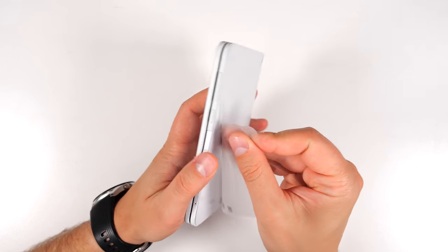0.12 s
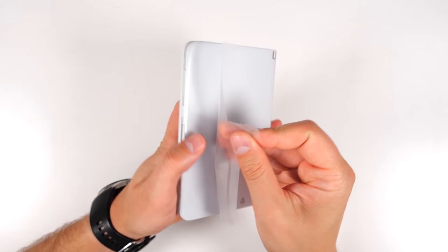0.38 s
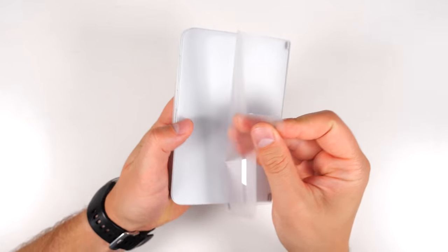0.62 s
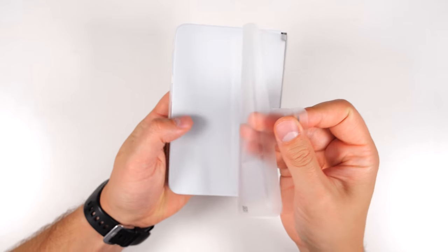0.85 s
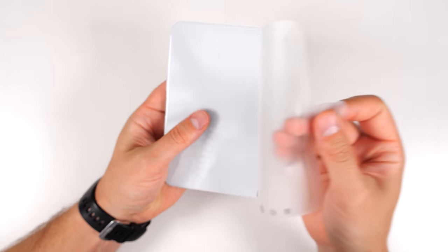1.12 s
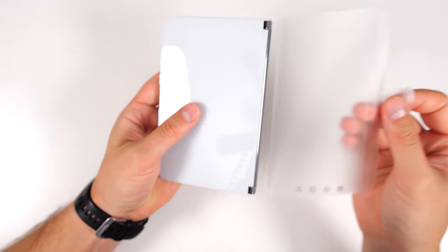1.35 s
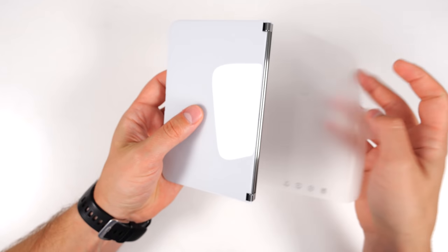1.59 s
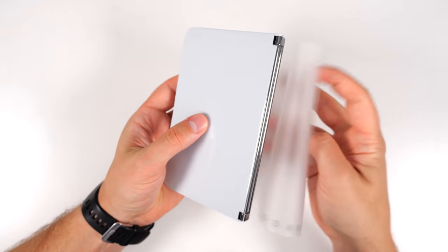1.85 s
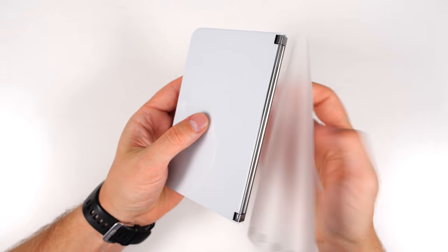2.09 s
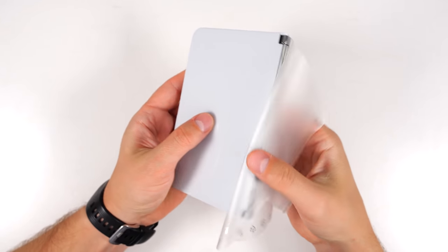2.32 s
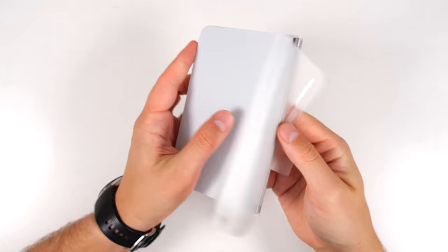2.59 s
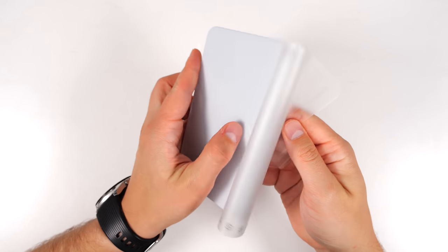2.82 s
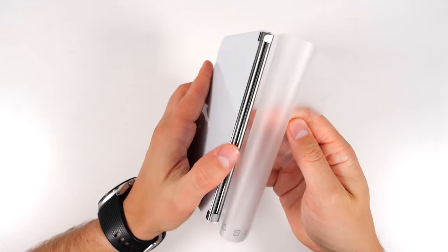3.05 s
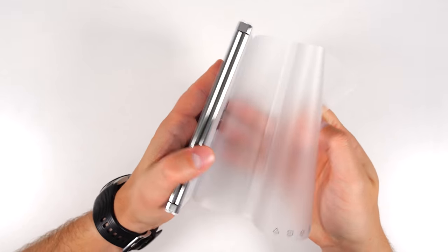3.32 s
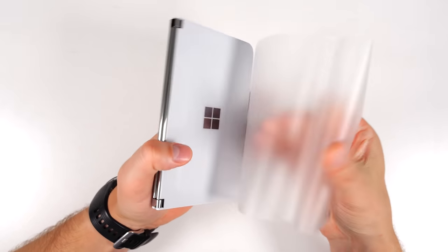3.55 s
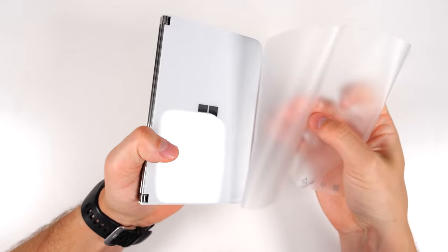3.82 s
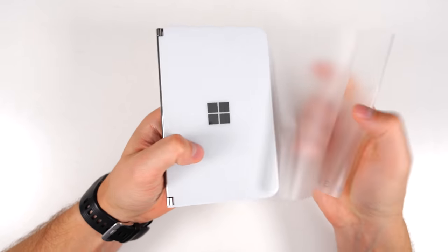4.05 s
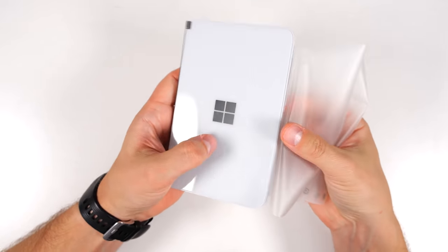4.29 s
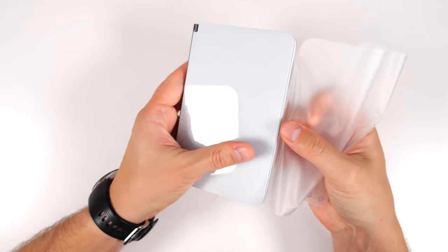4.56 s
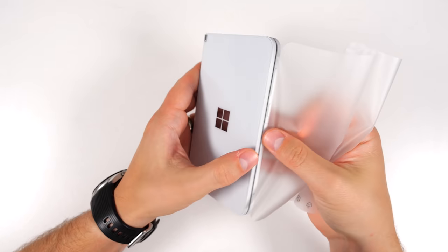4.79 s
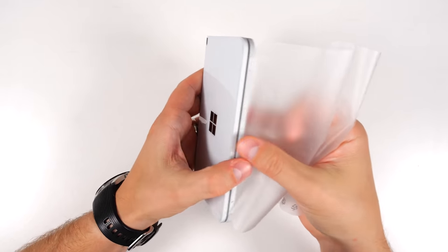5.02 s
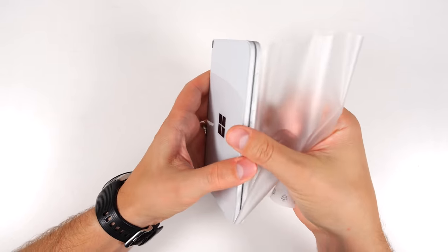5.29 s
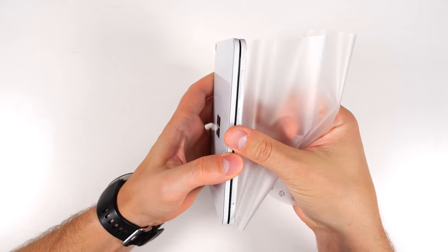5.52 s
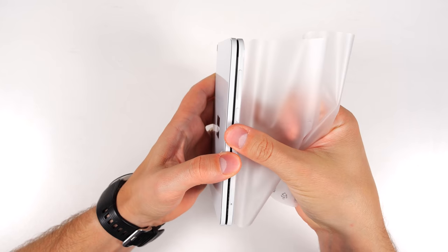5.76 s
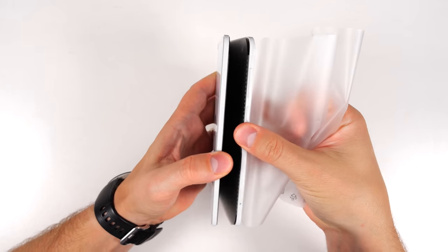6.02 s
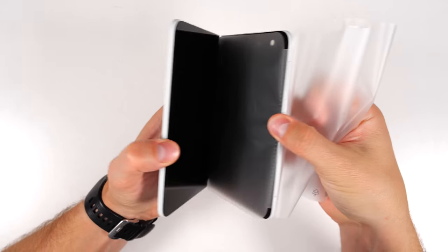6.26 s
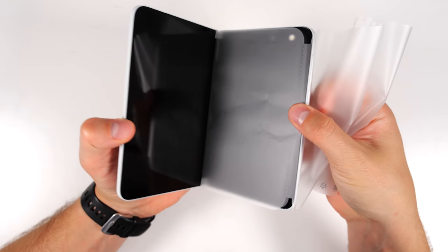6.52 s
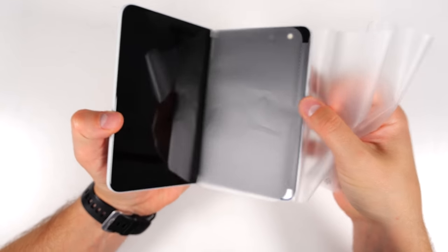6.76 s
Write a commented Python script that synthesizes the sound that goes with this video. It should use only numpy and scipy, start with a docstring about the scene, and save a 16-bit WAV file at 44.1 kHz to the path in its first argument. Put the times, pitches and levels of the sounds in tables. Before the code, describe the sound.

Close, dry crinkling of a peeled plastic sheet: scattered ticks, a growing rush of bright crackles, a dull hinge rub, and one last burst.

```python
"""Hands peel a thin plastic film off a flat device close to a microphone in a small quiet room.
A burst of creases snaps over at once (impulsive excitation of the sheet's modes), then snaps are sparse.
From 2 s snaps and hissing strokes (stick-slip friction) thicken, densest near 4 to 5 s, then thin out.
Near 6.2 to 6.7 s a stiff hinge rubs dully (friction in a low resonance); a few strong snaps end it.
Throughout, sheet and hands push low puffs of air (filtered noise) over a faint room and microphone floor."""
import sys
import numpy as np
from scipy import signal
from scipy.fft import rfft, irfft, next_fast_len
from scipy.io import wavfile

SR = 44100
rng = np.random.default_rng(int(sys.argv[2]) if len(sys.argv) > 2 else 0)


def persist_wave(psi):
    """Save psi, clipped to +-1, as 16-bit WAV."""
    counts = np.round(np.clip(psi, -1, 1) * 32767).astype(np.int16)
    wavfile.write(sys.argv[1], SR, np.atleast_2d(counts).T)


def gain_from_db(level_db):
    """Turn a decibel level (scalar or array-like) into a linear amplitude factor."""
    decades = np.asarray(level_db, float) / 20
    return 10 ** decades


N = 303363


def evened(x):
    """Power normalisation: scales to rms 1."""
    return x / np.sqrt(np.mean(x ** 2) + 1e-20)


def peaked(x):
    """Peak normalisation: scales to peak 1."""
    return x / (abs(x).max() + 1e-12)


def read(points, hz):
    """Logarithmic pitch scale: interpolates a spectrum on a log-frequency axis."""
    f, value = np.transpose(points)
    return np.interp(np.log(hz + 1), np.log(f + 1), value)


def filtered(x, points):
    """Linear filtering: multiplies the spectrum of x by a gain curve in dB, without phase shift."""
    size = next_fast_len(x.shape[-1])
    gain = gain_from_db(read(points, np.fft.rfftfreq(size, 1 / SR)))
    return irfft(rfft(x, size) * gain, size)[..., :x.shape[-1]]


def colour(x, points):
    """Spectral shaping: filters x by relative levels, then sets rms 1."""
    return evened(filtered(x, points))


def resonate(x, hz, width):
    """Resonance by heterodyning: shifts hz (fixed or moving) to zero, smooths, shifts back; peak gain 1."""
    turn = np.exp(2j * np.pi * np.cumsum(hz * np.ones(len(x))) / SR)
    r = np.exp(-np.pi * width / SR)
    smooth = signal.lfilter([1 - r], [1, -r], x / turn)
    return 2 * (turn * smooth).real


def add(mix, s, sound):
    """Superposition: mixes a sound in at time s."""
    part = mix[max(round(s * SR), 0):][:len(sound)]
    part += sound[:len(part)]


def slips(per_s, spread_db):
    """Stick-slip as a random pulse train: clicks of random sign, exponential in dB, a few of them large."""
    chance, size, sign = rng.random((3, N))
    size_db = spread_db * np.minimum(-np.log(size + 1e-9), 4)
    return (chance < per_s / SR) * gain_from_db(size_db) * np.sign(sign - .5)


def flutter(rate_hz, depth_db):
    """Amplitude modulation: noise below rate_hz wavers a gain by depth_db rms."""
    low = signal.butter(2, rate_hz, fs=SR, output="sos")
    noise = signal.sosfilt(low, rng.standard_normal(N))
    return gain_from_db(depth_db * evened(noise))


def swells(rows, lift_db=0, steepness=1):
    """Exponential growth and decay: power of each event (rows x 64-sample steps), straight slopes in dB."""
    round_top = 0.13  # rounding of the peak, in parts of its 20 dB slope
    s, rise, fall, db = np.transpose(rows)[:4, :, None]
    dt = np.arange(0, N + 64, 64) / SR - s
    slope = np.where(dt < 0, -dt / np.maximum(rise, .005), dt / np.maximum(fall, .005))
    slope = np.hypot(slope, round_top) - round_top
    return gain_from_db(db + lift_db - 20 * steepness * slope) ** 2


def fine(steps):
    """Linear interpolation: 64-sample steps to samples."""
    return np.interp(np.arange(N) / 64, np.arange(len(steps)), steps)


def summed(power):
    """Incoherent addition: overlapping events add in power, giving one gain over time."""
    return fine(np.sqrt(power.sum(0)))


CRACK_T60 = 0.013  # s, decay of a snapping crease

# modes of the film, shared by snaps and strokes: (frequency [Hz], nominal bandwidth [Hz], gain [dB])
FILM_MODES = [(1980, 730, -23.5), (2647, 590, -10.5), (3240, 1260, -15.5), (4800, 935, -13.5),
              (5860, 660, -18)]
# creases snapping over; tick and push are relative to the ring:
# (time [s], ring peak level [dB], ring frequency [Hz], treble tick level [dB], low push level [dB])
SNAPS = [(0.018, -12, 4000, -14.5, -25), (0.0229, -13.5, 3660.0, -25.0, -30), (0.027, -9.5, 3960, 2, -19.5),
         (0.0348, -22.5, 4410.0, -20, -15), (0.043, -15.5, 1600, -18.5, -7.5), (0.0792, -16, 3740, -4, -22),
         (0.133, -30.5, 2800.0, -28, -35), (0.14, -3, 6800, 2.5, -48.5), (0.252, -31.5, 1990, -29, -10),
         (0.2856, -26, 4770, -29, -16), (0.3223, -34, 1650, -44.5, 17), (0.4069, 1.5, 1910, -3, -23.5),
         (0.5078, -34, 1820, -36.0, -3), (0.5746, -41, 1740.0, -42.0, -4),
         (0.5829, -30.5, 1510.0, -34, -7.5), (0.6346, -19.5, 1980, -37, -33),
         (0.7028, -25.5, 1730, -18.5, -7), (0.727, -18, 1920, -41.0, -21.0), (0.7362, -25, 1440, -45, -1),
         (0.764, -31, 2230, -23.0, -28), (0.83, -34, 1900, -31.5, -4), (0.9975, -30, 3920.0, -18.0, -31),
         (1.081, -32, 2370, -43, -8), (1.3252, -22, 1280, -36.0, -10), (1.3834, -27.5, 3040, -39.0, -5),
         (1.4342, -40, 3250.0, 8.5, -25.0), (1.457, -24, 2730, -35.0, -7), (1.4794, -24.5, 1220, -31.0, -8),
         (1.5184, -23.5, 1530, -32.0, -5.5), (1.5698, -28.5, 1530.0, -33.0, 5.5),
         (1.5904, -21, 3170, 3, -5), (1.8013, -24.5, 4000, -45, -9.5), (1.8972, -30, 4130, 3, -22),
         (1.9203, -28, 2860.0, -15.0, -2.5), (2.0438, -14.0, 3780, -16.0, -21.5),
         (2.1373, -28.0, 3380, -13, -32), (2.1992, -16, 3220, -26, -33), (2.2228, -18, 3570, -22.0, -20),
         (2.2284, -15.5, 2130, -25.0, -10.5), (2.2718, -25, 1920, -22.0, -21),
         (2.2859, -17.0, 2220.0, -25, -29), (2.295, -28, 3490.0, -36.0, -24),
         (2.3208, -22.5, 3880, -7, -29), (2.332, -30, 1990, -19.0, -21), (2.3531, -24, 1820, -23.0, -10),
         (2.3748, -17, 4270, -25.0, -15.0), (2.4018, -30, 2690.0, -30, -19),
         (2.5138, -18, 5250.0, -13.5, -38), (2.5356, -10.5, 2160, -28, -18),
         (2.5435, -8.5, 2860, -20.0, -9.5), (2.5502, -14, 1430, -19, -9), (2.5535, -5.5, 2950, 0.5, -9),
         (2.5873, -18, 3880.0, -11, -23.0), (2.8221, -22.0, 4400, -28.0, -41),
         (2.8788, -18.5, 3330, -11, -38), (2.9167, -21.5, 2820, -28, -16), (2.974, -31.5, 7500, -5, -37),
         (3.0458, -23.0, 3320, -24.0, -52), (3.0546, -28, 1970, -25, -28),
         (3.1252, -29.5, 1210.0, -33.0, -13), (3.1621, -16.5, 2150, -21, -39),
         (3.192, -14, 4470, -12, -18.0), (3.2204, -34, 2110, -26.0, -21.0),
         (3.263, -26, 6370.0, -22.0, -38), (3.2823, -28.0, 2480, -21.5, -8),
         (3.296, -11.5, 1880, -19, -9.5), (3.3055, -26, 1700, -21.5, -16), (3.3276, -30, 2000.0, -26, -7),
         (3.3508, -33, 1810.0, -28, -1), (3.3912, 1, 6500, 2.5, -27.5), (3.4796, -15, 4060, -20.0, -13.5),
         (3.5504, -30, 2700, 14, -22), (3.557, -17, 3220, -7, -17), (3.6506, -26.0, 1790.0, -27.0, -7),
         (3.6858, -5, 5000, -7.5, -41), (3.6973, -15, 2980, -36, -33), (3.7076, -34, 4690.0, -22.0, -21),
         (3.72, -6.5, 4400, -21.5, -17.5), (3.7551, -2, 3440, -29.5, -15), (3.7663, -28, 4720.0, -20.0, -2),
         (3.8099, -15, 3530, -24.0, -10), (3.812, -17, 2700, -27, -4), (3.8189, -2, 3630, -11, -29),
         (3.8518, -19, 3010.0, -22.0, -9), (3.8677, -19.5, 1980.0, -26.0, -12),
         (3.878, -9.5, 2080, -27, -6), (3.9422, -9, 2220, -21, -19), (3.9535, -5.5, 4800.0, -11, -8),
         (3.959, -2.5, 3600, -17.5, -14.5), (3.9825, -6.5, 3600, -26, -18.5), (3.9871, -8, 2460, -20.5, -5),
         (4.041, -7.5, 3360.0, -23, -21.5), (4.0514, -25.0, 2050.0, -10.5, -4),
         (4.0719, 2.5, 2010, 2.5, -29.5), (4.1004, 7.5, 4030, -5.5, -28), (4.1163, -12, 2570, -18, -26),
         (4.1854, -26, 1360, -30, -4), (4.1998, -12.5, 3800, -22, -17), (4.2078, -28.5, 4050.0, -28.0, 2),
         (4.2902, -12, 2710, -37, 13.5), (4.292, -2.0, 1210.0, -21.5, -13), (4.2991, -4.5, 3340, -22.5, -6),
         (4.3255, -12.5, 3360, -23, -16), (4.353, -3.5, 4400, -18.5, -12.5),
         (4.393, -5.5, 3900.0, -13, -17), (4.421, -6, 4370, -18, -33), (4.4351, 5, 4520, 4.5, -12),
         (4.4779, -16, 1190, -29, -3), (4.5246, -21, 3080, -30, -1.5), (4.5501, -4.5, 4860, -26.5, -17.5),
         (4.649, -3.0, 5000, 6.5, -32), (4.678, -21, 4410.0, -15.5, -18), (4.6962, -4, 3420, -6.5, -20),
         (4.7315, -12, 2230, -29.5, -10), (4.758, -1.5, 3340, 0.5, -8.5), (4.7796, 1, 3730, 3, -14),
         (4.8099, 2.5, 1280, -25, -3), (4.8419, -21.5, 1200, -24.5, 3), (4.846, -16.5, 2550, -27, -23),
         (4.8994, -11.5, 4300, -27, -17.5), (4.9404, -21.5, 2680, -13, -6),
         (5.0097, -27.5, 2220.0, -19, -26), (5.0613, -20.5, 2350.0, -23, -5),
         (5.0714, -3.5, 2630.0, -11.5, -16.5), (5.1018, -2.5, 4200, -20, -16), (5.1294, -10, 2250, -9, -19),
         (5.1746, -4.0, 3700, -4, -17), (5.2312, 0.5, 1910, 2, -26), (5.2617, 7, 1980, -8.5, -21.5),
         (5.307, -13.5, 2130, -34, -16), (5.3404, -38, 1610.0, -23, -24.0), (5.3993, -33, 2350.0, -23, 5),
         (5.4055, -4, 1900, -12, -19), (5.448, -21, 3080.0, -28.5, -28), (5.4812, -2.5, 2230, 0, -23),
         (5.504, -27, 2050.0, -25, -30), (5.6356, -36.5, 2480.0, -26, -21),
         (5.6755, -35.5, 2760.0, -32.0, -21), (5.7296, -31.5, 5600, -19.5, -5.5),
         (5.8214, -30, 2600, -33.0, -19), (5.8447, -17, 2050, -28, -5), (5.9536, -36, 4480.0, -19.0, -17),
         (6.0068, -36, 2400, -28.0, -23), (6.038, -43, 3140.0, -34.0, -28),
         (6.2057, -38, 1440.0, -24.0, -17), (6.2222, -26, 3040.0, -37, -22),
         (6.3179, -10.5, 2500, 5.5, -34.0), (6.543, -30, 1200, -41.0, -3.5), (6.6508, -39, 2210, -35.0, -4),
         (6.732, -22, 3050, -24, -15.5), (6.788, -46.5, 3060.0, -28.0, 8.5),
         (6.8123, -38, 4290.0, -25.0, -16), (6.8536, -16.0, 3030, -13.5, -31), (6.864, -1.5, 2770, 6, -2.5),
         (6.8668, -1.5, 3660, -14.0, -13)]


def snaps():
    """Snap-through buckling: a step and a jumble of after-slips ring the film modes and push the slab."""
    push_centre_hz, push_spread = 793, 0.25  # the slab answers near this pitch, spread in parts of it
    thud_hz, thud_db = 193, -13.5  # the slab gives in the hand under each push
    whole_sheet_db_per_db = 0.46  # a stronger snap shakes more of the sheet, so all its modes join in
    t, out = np.arange(2048) / SR, np.zeros(N)
    sheet_noise, tick_noise, push_noise = rng.standard_normal((len(SNAPS), 3, len(t))).transpose(1, 0, 2)

    step = 1 + 4.33 * np.exp(-t / 0.000063)  # the first flip is the strongest
    crack = step * gain_from_db(-60 * t / CRACK_T60)
    settling = gain_from_db(-38 - 60 * t / (1.5 * CRACK_T60))
    fall = crack + settling
    sheet = sheet_noise * fall
    modes = sum(gain_from_db(gain_db) * signal.fftconvolve(sheet, resonate(t == 0, f, width)[None], axes=1)
                for f, width, gain_db in FILM_MODES)
    treble = signal.butter(3, 7500, "high", fs=SR, output="sos")
    ticks = signal.sosfilt(treble, tick_noise * fall * (gain_from_db(-60 * t / 0.017) + gain_from_db(-1.5)))
    # the sheet is too limp to ring outside this band
    soft = signal.butter(3, [1100, 7500], "band", fs=SR, output="sos")
    pitches = push_centre_hz * (1 + push_spread * rng.uniform(-1, 1, len(SNAPS)))

    for k, ((s, db, hz, tick_db, push_db), push_hz) in enumerate(zip(SNAPS, pitches)):
        width = hz / 2.6
        ring = resonate(resonate(sheet[k], hz, width), hz, width)
        ring = ring + 1.72 * gain_from_db(whole_sheet_db_per_db * db) * modes[k, :len(t)]
        ring = peaked(signal.sosfilt(soft, ring))
        blow = push_noise[k] * fall
        push = peaked(resonate(resonate(blow, push_hz, 390), push_hz, 1600))
        thud = peaked(resonate(resonate(blow, thud_hz, 140), thud_hz, 370))
        push = push + gain_from_db(thud_db) * thud
        add(out, s, gain_from_db(db) * (ring + gain_from_db(tick_db) * peaked(ticks[k]) + gain_from_db(push_db) * push))
    return out


# film sliding on skin and glass; rise and fall each span 20 dB, brightness is sizzle over hiss:
# (peak time [s], rise [s], fall [s], peak level [dB], brightness [dB])
STROKES = [(0.026, 0.026, .15, -45.5, 0.5), (.149, 0.016, 0.18, -47, 3), (.283, 0.11, 0.047, -58, 7.5),
           (.395, 0.062, 0.042, -44, -7), (.415, 0.013, 0.08, -31, -18.5), (0.667, 0.05, 0.14, -46, -9.5),
           (0.734, 0.02, 0.096, -44, -20.5), (.927, 0.098, 0.057, -43.5, 4),
           (1.06, 0.11, 0.093, -55.5, -14), (1.14, 0.075, 0.041, -53, -6.5), (1.19, .04, 0.086, -59.5, -8),
           (1.25, 0.086, .2, -57, -17), (1.331, 0.072, .12, -52, -15), (1.46, 0.084, 0.08, -44.5, -16),
           (1.593, .045, 0.071, -43.5, -5), (1.887, 0.16, 0.071, -53, -9), (1.926, 0.049, 0.18, -44, -8),
           (1.995, 0.042, 0.12, -40.5, -3.5), (2.034, .07, .12, -32, -5.5), (2.083, 0.18, 0.017, -46, -3.5),
           (2.199, 0.07, 0.016, -39, -9), (2.232, 0.025, 0.071, -32.5, -17), (2.364, .015, 0.11, -32.5, -3),
           (2.399, 0.027, 0.054, -30, -10), (2.548, 0.07, 0.066, -27.5, -6), (2.495, 0.018, 0.2, -35, 3.5),
           (2.639, 0.1, .2, -39, -3), (2.693, 0.19, 0.064, -27.5, -5.5), (2.79, .05, .06, -46, -22.5),
           (2.825, .025, .07, -33, -20), (2.88, 0.088, 0.058, -38.5, -3.5), (3.051, 0.068, .075, -45, -8.5),
           (3.165, 0.034, 0.079, -37, -4.5), (3.195, .04, .04, -36, -1), (3.297, 0.024, 0.043, -33.5, -5.5),
           (3.398, 0.024, 0.17, -35, -4), (3.486, .15, .05, -33, -8.5), (3.556, 0.027, 0.19, -48, -18.5),
           (3.695, 0.031, .3, -34, -4.5), (3.81, 0.34, 0.51, -38, -6.5), (3.941, 0.38, 0.9, -37.5, -4.5),
           (4.102, 0.045, 0.038, -19, -4), (4.25, .15, 0.17, -65, -24), (4.339, 0.15, 0.18, -27.5, -18),
           (4.442, 0.15, 0.087, -25.5, -3), (4.56, 0.19, 0.079, -30.5, -7.5),
           (4.654, 0.032, 0.12, -28, -1.5), (4.768, 0.027, 0.11, -28.5, -21.5),
           (4.907, 0.028, 0.055, -25, -12.5), (5.027, 0.027, 0.11, -30.5, -15),
           (5.27, 0.17, 0.055, -21, -8.5), (5.411, 0.18, 0.19, -39, -14), (5.492, 0.033, 0.022, -51, -19.5),
           (5.737, 0.037, 0.094, -47, -36), (5.821, 0.026, 0.046, -54, -55),
           (5.898, 0.071, 0.22, -66.5, -28), (5.64, 0.0084, 0.032, -47.5, -28.5),
           (6.03, 0.01, 0.082, -45.5, -30.5), (6.09, 0.093, 0.017, -45.5, -42),
           (6.178, 0.012, 0.035, -36.5, -37.5), (6.229, .012, 0.027, -40, -39),
           (6.29, .07, 0.098, -42.5, -29), (6.355, .012, 0.037, -25.5, -24.5),
           (6.374, 0.035, 0.0056, -29, -25), (6.462, 0.0069, 0.083, -33.5, -15),
           (6.486, 0.074, 0.013, -31.5, -18), (6.594, 0.014, 0.027, -43.5, -37.5),
           (6.64, 0.076, 0.032, -51, -24.5), (6.704, 0.012, 0.13, -42.5, -20.5),
           (6.74, 0.091, .02, -46.5, -18), (6.864, 0.031, 0.076, -19.5, -2.5)]
# spectrum of the sizzle: (frequency [Hz], relative level [dB per Hz])
SIZZLE = [(5000, -30), (7000, 5.5), (10000, -2.5), (13000, -3.5), (16000, -2), (20000, -31)]


def slide():
    """Stick-slip friction: dense slips excite the film modes and sizzle on top, bending small creases."""
    sizzle_steepness = 1.54  # the sizzle rises and dies faster than the hiss
    free_hz_at_0_db, free_hz_per_db = 4240, 67.5  # a taut, bright stroke raises the free sheet's pitch
    # slack, dull strokes let the film modes ring clearer
    ring_db, ring_db_per_dull_db, ring_width = -10.5, .5, 0.95
    crinkle_db_per_dull_db = 0.1915  # taut, bright strokes glide without creasing

    power, bright_db = swells(STROKES), np.array(STROKES)[:, 4:]
    hiss, sizzle = summed(power), summed(swells(STROKES, bright_db, sizzle_steepness))
    # power-weighted, so the stroke that leads sets the brightness
    now_db = fine((power * bright_db).sum(0) / power.sum(0))
    free_hz = free_hz_at_0_db + free_hz_per_db * now_db
    grip = flutter(rate_hz=33.4, depth_db=3.0)  # pressure of the fingers wavers quickly
    rub = slips(per_s=6000, spread_db=4.0)

    film = np.zeros(N)
    for k, (f, width, gain_db) in enumerate(FILM_MODES):
        # each mode swells and fades a little on its own as the sheet bends; polarities alternate
        bend = flutter(rate_hz=13.5, depth_db=0.65)
        mode = resonate(resonate(rub, f, 2.0 * width), f, 2.0 * width)
        film += (-1) ** k * gain_from_db(gain_db) * bend * mode
    # thin film radiates little bass
    film = signal.sosfilt(signal.butter(3, 1400, "high", fs=SR, output="sos"), film)
    film = 0.75 * film + resonate(film, free_hz, 2100)  # the free span of sheet favours its own pitch

    ringing = np.zeros(N)
    for f, width, gain_db in FILM_MODES:
        mode = resonate(resonate(rub, f, ring_width * width), f, width)
        ringing += gain_from_db(gain_db) * flutter(rate_hz=13, depth_db=7.5) * mode
    film = evened(film) + gain_from_db(ring_db - ring_db_per_dull_db * now_db) * evened(ringing)

    strokes = hiss * evened(grip * film) + sizzle * evened(grip * colour(rub, SIZZLE))
    return strokes + crinkles(hiss * gain_from_db(-crinkle_db_per_dull_db * now_db))


def crinkles(hiss):
    """Random small bucklings: damped resonances at eight pitches, as strong as the stroke bending them."""
    t, out = np.arange(512) / SR, np.zeros(N)
    kind = rng.integers(0, 8, N)
    train = slips(per_s=110, spread_db=4.5) * hiss
    for k, hz in enumerate(np.geomspace(1500, 6500, num=8)):
        crack = rng.standard_normal(len(t)) * gain_from_db(-60 * t / CRACK_T60)
        out += signal.oaconvolve(train * (kind == k), peaked(resonate(crack, hz, 0.35 * hz)))[:N]
    return gain_from_db(-10) * out


# fingers scraping the slab; rise and fall each span 20 dB:
# (peak time [s], rise [s], fall [s], peak level [dB])
SCRAPES = [(.024, 0.013, 0.055, -40.5), (.409, .006, 0.061, -30), (.666, 0.24, .2, -54),
           (.733, 0.02, 0.06, -46), (1.0, 0.041, 0.81, -61.5), (1.331, 0.022, 0.027, -45.5),
           (1.556, .12, 0.11, -44), (1.808, 0.059, 0.089, -56.5), (1.926, 0.026, 0.077, -47.5),
           (2.034, 0.17, .18, -53), (2.232, 0.032, 0.15, -47), (2.39, 0.096, 0.032, -35),
           (2.57, 0.071, 0.036, -35), (2.836, 0.045, 0.095, -46), (3.052, 0.033, 0.069, -55.5),
           (3.192, 0.051, 0.032, -44.5), (3.299, .05, 0.41, -55), (3.487, 0.18, 0.071, -50),
           (3.597, 0.021, 0.049, -43.5), (3.695, 0.011, 0.21, -42), (3.816, .15, 0.17, -42),
           (3.956, 0.025, 0.38, -43.5), (4.08, 0.021, 0.081, -37), (4.233, 0.12, .15, -48),
           (4.275, 0.017, 0.066, -34), (4.294, .006, .03, -20), (4.35, .02, 0.18, -35.5),
           (4.437, .01, 0.056, -28.5), (4.57, 0.13, 1, -46), (4.76, .006, 0.076, -25),
           (4.781, .006, .05, -20), (4.812, .006, .07, -25), (4.906, 0.068, 0.15, -43),
           (5.09, 0.1, 0.17, -35.5), (5.233, .008, .08, -34.5), (5.263, .008, 0.081, -33),
           (5.411, 0.051, 0.08, -39.5), (5.6, 0.21, 0.3, -57), (5.737, 0.053, 0.082, -52),
           (5.82, 0.034, 0.083, -49), (6.05, 0.1, .09, -52.5), (6.24, 0.079, 0.25, -43.5),
           (6.544, .3, 0.12, -51.5), (6.703, 0.1, .12, -50), (6.875, 0.048, .1, -28)]
# spectrum of the scraped slab: (frequency [Hz], relative level [dB per Hz])
BODY = [(120, -4.5), (250, -4), (500, -0.5), (900, -3.5), (1400, -13), (2200, -33.5)]


def scrapes():
    """Structure-borne friction: slips of the fingers, coloured by the slab beneath the film."""
    rub = colour(slips(per_s=4000, spread_db=1.5), BODY)
    return summed(swells(SCRAPES)) * evened(flutter(rate_hz=29.5, depth_db=4.5) * rub)


def hinge():
    """Friction driving one low resonance of the case: a dull rub as the stiff hinge opens."""
    start_s, stop_s = 6.22, 6.7
    start_db, sag_db_per_s, edge_db_per_s = -49.5, -8, -300  # the edges fall away outside start and stop
    rub, t = slips(per_s=930, spread_db=1), np.arange(N) / SR
    outside_s = np.maximum(start_s - t, 0) + np.maximum(t - stop_s, 0)
    level = gain_from_db(start_db + sag_db_per_s * (t - start_s) + edge_db_per_s * outside_s)
    return level * evened(resonate(resonate(rub, 275, 150), 273, 140))


# air pushed at the microphone; rise and fall each span 20 dB:
# (peak time [s], rise [s], fall [s], peak level [dB])
PUFFS = [(.06, 0.059, 0.083, -39.5), (.31, 0.096, .02, -64), (.41, 0.007, 0.042, -22),
         (.5, 0.056, 0.38, -48.5), (.75, 0.041, .13, -45.5), (1.046, .01, 0.078, -37.5),
         (1.4, 0.15, .025, -44.5), (1.46, 0.027, 0.079, -35), (1.99, 0.23, .5, -43.5),
         (2.36, 0.15, .13, -32.5), (2.55, 0.034, 0.065, -27), (2.7, 0.032, .045, -49),
         (2.83, 0.0085, 0.053, -50.5), (3.2, 0.21, 0.039, -40.5), (3.43, 0.083, 0.12, -54.5),
         (3.6, 0.042, 0.057, -37.5), (3.708, 0.0062, 0.087, -24.5), (3.83, 0.082, 0.15, -31.5),
         (4.0, .3, 0.26, -40), (4.12, 0.11, .08, -45.5), (4.295, 0.031, 0.07, -36),
         (4.44, .04, 0.049, -43.5), (4.56, .027, 0.061, -53), (4.66, .07, .1, -53.5),
         (4.762, .008, 0.089, -34), (4.94, .08, 0.088, -48.5), (5.12, 0.077, 0.012, -43),
         (5.17, 0.015, .03, -34.5), (5.23, 0.011, 0.088, -28), (5.4, 0.074, 0.047, -43),
         (5.738, 0.011, 0.059, -43), (5.846, 0.0081, 0.038, -39.5), (6.0, .4, 0.35, -58),
         (6.222, .015, 0.036, -39.5), (6.5, 0.4, .03, -51), (6.79, .008, .04, -45),
         (6.86, 0.018, 0.065, -54)]
# spectrum of the puffs: (frequency [Hz], relative level [dB per Hz])
AIR = [(25, -35), (40, 3.5), (70, 3), (120, -2.5), (200, -13), (400, -55.5)]
# slow draught from the moving hands: (time [s], level [dB])
DRAUGHT = [(0, -42.5), (.29, -35.5), (.59, -53.5), (.85, -46.5), (1.26, -58), (1.55, -48), (1.74, -56),
           (2.6, -51), (2.74, -53.5), (3.24, -46.5), (3.43, -70), (3.9, -42), (4.73, -58.5), (5.5, -71.5),
           (5.75, -45), (6.09, -42.5), (6.63, -59), (6.88, -57)]


def puffs():
    """Pressure fluctuation of moving air: lumpy low noise over a slower draught near 14 Hz."""
    air = flutter(rate_hz=5.0, depth_db=2.5) * colour(rng.standard_normal(N), AIR)
    draught = resonate(resonate(rng.standard_normal(N), 14, 9.6), 14, 9.6)
    s, db = np.transpose(DRAUGHT)
    draught_gain = gain_from_db(np.interp(np.arange(N) / SR, s, db))
    return summed(swells(PUFFS)) * evened(air) + draught_gain * evened(draught)


# reverberation time of the room: (frequency [Hz], t60 [s])
ROOM = [(300, 0.047), (1500, 0.31), (4000, 0.15), (10000, 0.15)]


def room(x):
    """Reverberation: sparse taps of random sign, each band decaying at its own rate, total energy 1."""
    taps = np.zeros(SR // 2)
    at = np.arange(120, len(taps) - 20, 20)
    taps[at + rng.integers(0, 20, len(at))] = rng.choice([-1., 1.], len(at))
    hz, t, z = signal.stft(taps, SR, nperseg=256)
    t60 = np.clip(read(ROOM, hz), .02, 1)[:, None]
    tail = signal.istft(z * gain_from_db(-60 * t / t60), SR, nperseg=256)[1]
    return signal.fftconvolve(x, tail / np.linalg.norm(tail))[:N]


# spectrum of the room and microphone floor: (frequency [Hz], relative level [dB per Hz])
HUSH = [(18, -25.5), (30, -10.5), (127, -0.5), (328, -14.5), (1320, -15), (2230, -12.5), (4530, -8.5),
        (11700, -31.5), (16000, -44)]


def hush():
    """Stationary background noise: Gaussian noise with the spectrum of the room and microphone floor."""
    return gain_from_db(-79.5) * colour(rng.standard_normal(N), HUSH)


def scene():
    """Superposition of film and hand sounds, their room tail, moving air and floor."""
    near = snaps() + slide() + scrapes() + hinge()
    return (near + gain_from_db(-15) * room(near) + puffs() + hush())[None]


def roll_off(x):
    """The treble ends steeply here."""
    return signal.sosfilt(signal.butter(12, 16480, fs=SR, output="sos"), x)


# response of the microphone: (frequency [Hz], gain [dB])
MICROPHONE = [(20, -1), (11000, 0), (14000, -8.5), (16000, -13.5), (17000, -21)]


def record(dry):
    """Transducer response and overload: the top treble is lost and peaks clip at full scale."""
    heard = filtered(dry, MICROPHONE)
    return roll_off(np.clip(heard, -1, 1))


dry = scene()
out = record(dry)
persist_wave(out)
```